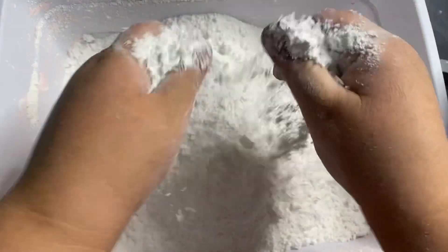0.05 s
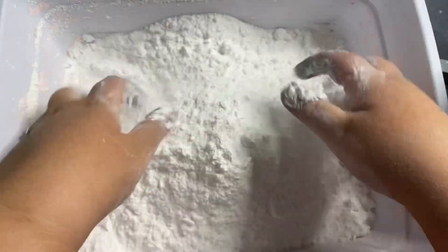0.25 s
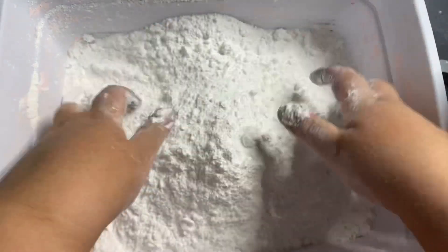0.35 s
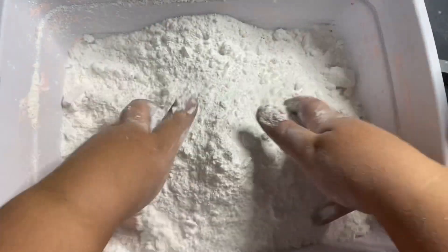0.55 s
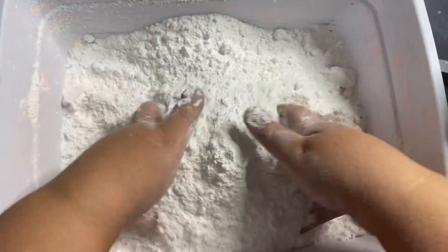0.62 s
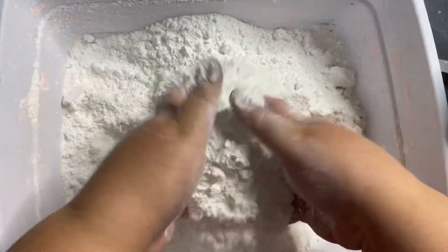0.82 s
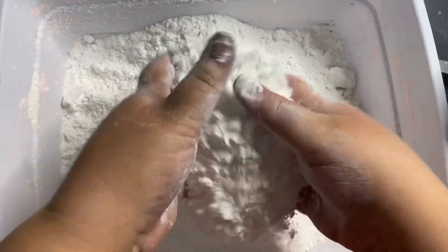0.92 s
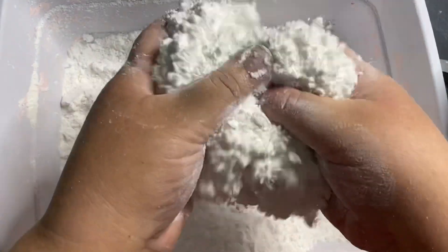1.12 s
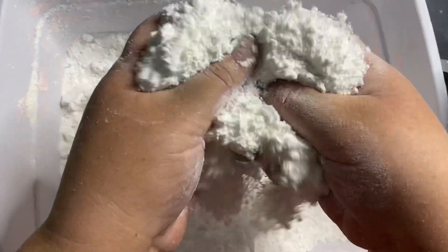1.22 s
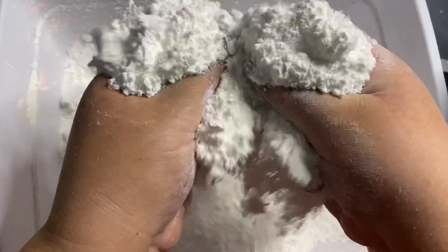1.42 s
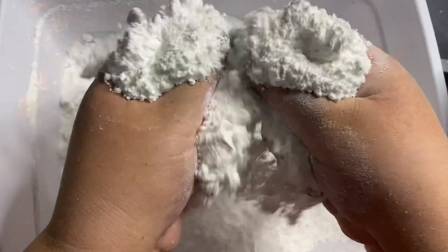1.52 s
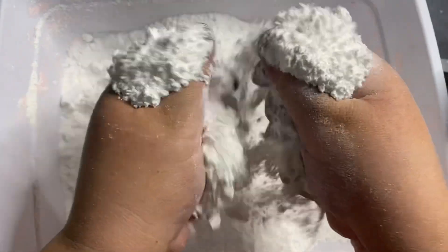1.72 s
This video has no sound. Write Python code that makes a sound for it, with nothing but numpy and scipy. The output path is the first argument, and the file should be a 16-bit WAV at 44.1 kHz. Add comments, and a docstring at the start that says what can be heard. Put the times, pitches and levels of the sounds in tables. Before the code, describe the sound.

Soft chalk powder is worked by hand in a plastic tub, close and dry in a quiet room. At about 0.3 seconds a handful thuds down and the tub booms. From 0.4 to 0.8 seconds hands plough through with a fine hiss and low rub. From about 1 second to 1.75, squeezed powder crunches and small lumps snap, over a faint rumble of stirred air.

```python
"""A handful of soft chalk powder thuds into a plastic tub, close to the microphone in a quiet room.
Two hands plough through the heap with a fine hiss and a low rub, then lift and squeeze the powder:
it crunches in tiny fractures and small lumps snap. Underneath, the handled tub booms
and the air stirred by the hands rumbles. The sound is dry and mono."""
import sys
import numpy as np
from scipy.fft import rfft, irfft, next_fast_len
from scipy.io import wavfile
from scipy.ndimage import map_coordinates

SR = 44100
rng = np.random.default_rng(int(sys.argv[2]) if len(sys.argv) > 2 else 0)


def output_pcm(signal):
    """Save a mono or channel-first signal as 16-bit PCM at the path in sys.argv[1].

    Samples are clipped to [-1, 1] before scaling.
    """
    pcm = np.clip(np.atleast_2d(signal).T, -1, 1) * 32767
    wavfile.write(sys.argv[1], SR, np.round(pcm).astype(np.int16))


N = 77175


def amp(db):
    return 10 ** (np.asarray(db) / 20)


def unit(x):
    return x / np.sqrt(np.mean(x ** 2) + 1e-20)


def along(points, hz):
    """Interpolate (frequency [Hz], value) points on a log frequency axis."""
    freqs, values = np.transpose(points)
    return np.interp(np.log(hz + 1), np.log(freqs + 1), values)


def level(rows):
    """A gain per sample from (time [s], level [dB]) points."""
    times, db = np.transpose(rows)
    return amp(np.interp(np.arange(N) / SR, times, db))


def wobble(rate):
    """A smooth random curve, rate knots a second."""
    return map_coordinates(rng.standard_normal(4096), [np.arange(N) * rate / SR], mode="wrap")


def colour(x, gain):
    """Minimum-phase filter with the given gain as a function of frequency."""
    size = 2 * next_fast_len(len(x))
    cepstrum = irfft(np.log(np.maximum(gain(np.fft.rfftfreq(size, 1 / SR)), 1e-6)), size)
    cepstrum[1:size // 2] *= 2
    cepstrum[size // 2 + 1:] = 0
    return irfft(rfft(x, size) * np.exp(rfft(cepstrum)), size)[:len(x)]


def shaped(x, spectrum):
    """x filtered by (frequency [Hz], gain [dB]) points, at rms 1."""
    return unit(colour(x, lambda hz: amp(along(spectrum, hz))))


def add(out, start_s, x):
    """Mix x into out from start_s on."""
    i = int(round(start_s * SR))
    out[i:i + len(x)] += x[:len(out) - i]


def grains(per_s, spread_db):
    """Random tiny fractures of uneven size."""
    chance, size, sign = rng.random(N), rng.standard_normal(N), rng.choice([-1, 1], N)
    return (chance < per_s / SR) * sign * amp(spread_db * np.minimum(size, 2))


def thuds(scatter_db=-23, scatter_t60=0.086, floor_hz=84, floor_t60=0.12, lag_s=0.000979):
    """Soft blows: a dull push spreads through the plastic, powder scatters, the tub and its floor ring."""
    # blows on the tub (time [s], level [dB], hardness [Hz], relative ring [dB], relative bass [dB])
    blows = [(0.2329, -1, 910, -15.5, -8), (0.3199, 0, 1570, -1, -15), (.3238, -8.5, 795, -1, -33),
             (.342, -20.5, 1410, -19, 5), (.362, -27, 910, -6, -20), (.444, -34, 596, -14, -22),
             (.559, -27, 500, 4, -23), (.580, -21.5, 700, -11, -20), (0.5843, -17, 1490, -2, -35),
             (.716, -29, 805, -3, -25), (.957, -29, 1400, -3, -22), (1.218, -29.5, 1800, 5.5, -27),
             (1.7262, -20.5, 1100, -0.5, -24)]
    # modes of the tub (frequency [Hz], relative level [dB], t60 [s])
    tub_modes = [(220.1, -15.5, 0.1), (290, -59, .1), (335.7, -13.5, 0.12), (458, -20, 0.12),
                 (509, -14, 0.078), (720, -23.5, 0.12), (798, -17.5, 0.089), (1040, -27, .1),
                 (1294, -23, .1), (1400, -31, 0.13), (1500, -51, 0.069), (1810, -25.5, 0.031),
                 (2800, -12, .03)]
    # the dull push of a blow (frequency [Hz], gain [dB])
    push_spectrum = [(30, 1.5), (90, 5.5), (240, 12.5), (420, -3), (650, 6), (820, 3), (930, -3.5),
                     (1300, 4.5), (1900, -5.5), (2300, -22), (2900, -4), (5000, -24), (15000, -4)]
    # the faint crack as it begins (frequency [Hz], gain [dB])
    crack_spectrum = [(1000, -17), (4000, -30), (8000, -39), (15000, -60)]
    out, t = np.zeros(N), np.arange(SR // 3) / SR
    freqs = np.fft.rfftfreq(len(t), 1 / SR)
    # bending waves: 500 Hz arrives lag_s late, lower tones later still
    dispersion = np.exp(-4j * np.pi * lag_s * np.sqrt(500 * freqs))
    for start_s, db, hard_hz, ring_db, bass_db in blows:
        soft = lambda hz: 1 / np.sqrt(1 + (hz / hard_hz) ** 6)
        body = lambda hz: soft(hz) * amp(along(push_spectrum, hz))
        impact = colour(1. * (t == 0), lambda hz: body(hz) + amp(along(crack_spectrum, hz)))
        push = irfft(rfft(impact) * dispersion, len(t))
        scatter = unit(colour(rng.standard_normal(len(t)), body)) * amp(scatter_db - 60 * t / scatter_t60)
        ring = sum(soft(hz) * amp(mode_db + rng.normal() - 60 * t / t60) * np.sin(2 * np.pi * hz * t)
                   for hz, mode_db, t60 in tub_modes)
        bass = amp(bass_db - 60 * t / floor_t60) * np.sin(2 * np.pi * floor_hz * t)
        add(out, start_s, amp(db) * (push / np.abs(push).max() + scatter + amp(ring_db) * ring - bass))
    return out


def snaps(crumble_db=-16, crumble_t60=0.012):
    """A lump breaks with a muffled click and crumbles for a few milliseconds."""
    # breaking lumps (time [s], click peak [dB], pitch [Hz], relative thin crack [dB])
    lumps = [(0.103, -22.5, 7600, -12), (0.1243, -33, 1100, 3), (0.208, -30, 900, -31),
             (.858, -31.5, 2170, -19), (.9282, -27.5, 3480, -12), (0.9983, -26.5, 1940, -13.5),
             (1.014, -41, 2400, -14), (1.0442, -32, 4500, -15), (1.061, -29, 4200, -1),
             (1.1276, -28, 5000, -12), (1.165, -22.5, 5150, 1), (1.1734, -26, 4540, -2),
             (1.184, -22, 1340, -15), (1.195, -26, 1260, -13), (1.2181, -16.5, 1730, -32),
             (1.231, -29, 1730, -6), (1.2548, -21, 1900, -15), (1.333, -25.5, 2200, -13),
             (1.3571, -24.5, 4930, 2), (1.383, -19.5, 2300, -3), (1.4056, -25.5, 2170, -14),
             (1.441, -12.5, 2940, -3), (1.477, -20, 2120, -28), (1.4912, -18, 2740, -15),
             (1.521, -24, 2800, 3), (1.551, -17.5, 1780, -24), (1.596, -23.5, 3200, 11),
             (1.628, -28.5, 2800, -17)]
    out, t = np.zeros(N), np.arange(SR // 20) / SR
    for start_s, db, pitch_hz, crack_db in lumps:
        highpass = lambda hz: hz / np.hypot(hz, 0.24 * pitch_hz)
        lowpass = lambda hz: 1 / np.sqrt(1 + (hz / (1.49 * pitch_hz)) ** 8)
        band = lambda hz: highpass(hz) * (lowpass(hz) + amp(crack_db) * pitch_hz / np.hypot(hz, pitch_hz))
        click = colour(1. * (t == 0), band)
        crumble = unit(colour(rng.standard_normal(len(t)), band)) * amp(crumble_db - 60 * t / crumble_t60)
        add(out, start_s, amp(db) * (click / np.abs(click).max() + crumble))
    return out


def crunch(peak_grains_per_s=3000, clump_db=2):
    """Squeezed powder fractures: single ticks under a light grip, dense clumps under a hard one."""
    # squeezing of the lifted handfuls (time [s], level [dB])
    grip = [(0, -52.5), (.1, -60), (.22, -49.5), (.36, -74), (.45, -50), (.7, -59), (.85, -61.5),
            (.95, -60), (1.07, -47.5), (1.15, -53), (1.185, -42), (1.3, -49), (1.45, -43.5), (1.6, -43.5),
            (1.75, -45.5)]
    # fracturing powder (frequency [Hz], gain [dB])
    spectrum = [(200, -28.5), (600, -3.5), (1100, -3), (2000, 2), (3600, -1), (4400, -3), (6500, -3.5),
                (9000, -5), (11500, -12.5), (15500, -14)]
    squeeze = level(grip)
    density = (squeeze / squeeze.max()) ** 0.9
    fractures = grains(peak_grains_per_s * density, spread_db=6) / np.sqrt(density)
    return shaped(fractures * amp(clump_db * wobble(170)), spectrum) * squeeze


def rub(flutter_db=2):
    """The heap rubs on the tub as the hands plough through it."""
    # push of the hands into the heap (time [s], level [dB])
    plough = [(0, -51.5), (.1, -52), (.2, -48.5), (.25, -36), (.33, -31.5), (.38, -42), (.45, -33.5),
              (.5, -39), (.55, -41.5), (.62, -43), (.70, -37.5), (.76, -46.5), (.83, -54), (1.0, -47),
              (1.14, -49.5), (1.22, -43), (1.3, -45.5), (1.44, -45), (1.75, -45.5)]
    # powder rubbing on plastic (frequency [Hz], gain [dB])
    spectrum = [(50, -19), (165, -3.5), (205, -0.5), (340, 4), (410, -1.5), (560, 2), (850, -9),
                (1200, -9.5), (1800, -15), (3000, -21), (12000, -40)]
    return shaped(rng.standard_normal(N) * amp(flutter_db * wobble(70.2)), spectrum) * level(plough)


def hiss(flutter_db=1.0):
    """Fine dust slides over the fingers, its ticks so dense that they merge."""
    # flow of the powder (time [s], level [dB])
    flow = [(0, -53), (.05, -54), (.075, -57.5), (.2, -62), (.27, -61), (.305, -45), (.325, -62),
            (.345, -66), (.41, -64), (.47, -53), (.54, -47), (.64, -41.5), (.715, -40.5), (.75, -48.5),
            (.79, -51.5), (.82, -64.5), (.95, -59.5), (1.15, -53.5), (1.45, -52.5), (1.75, -49)]
    # sliding dust (frequency [Hz], gain [dB])
    spectrum = [(300, -39), (1500, -7.5), (2500, -10.5), (5000, -4), (6400, -7.5), (8700, 1), (10000, -2),
                (11000, -7.5), (13500, -10), (15500, -14)]
    dust = grains(per_s=16000, spread_db=3.5)
    return shaped(dust * amp(flutter_db * wobble(150)), spectrum) * level(flow)


def digs():
    """Fingertips dig in: a smooth scrape, darker than the hiss, swells and fades."""
    # fingertip strokes (peak time [s], level [dB], rise [s], fall [s])
    strokes = [(.304, -42.5, 0.008, 0.013), (0.541, -39.5, 0.077, 0.078)]
    # scraped powder (frequency [Hz], gain [dB])
    spectrum = [(300, -24), (800, 9), (1150, -8), (1700, 2), (2300, -5.5), (3000, -1), (3800, -0.5),
                (4400, -11), (7000, -6), (10000, -14.5), (15000, -36)]
    t = np.arange(N) / SR
    force = sum(amp(db - 6.7 * ((t - peak_s) / np.where(t < peak_s, rise, fall)) ** 2)
                for peak_s, db, rise, fall in strokes)
    return force * shaped(rng.standard_normal(N), spectrum)


def boom(pitch_hz=121.1, wander_hz=4.35, flutter_db=1.85):
    """A narrow low resonance swells and wavers as the tub is handled."""
    # the tub's low boom (time [s], level [dB])
    swell = [(0, -44.5), (.2, -53), (.24, -34), (.275, -17), (.31, -17), (.345, -33), (.40, -26),
             (.45, -45), (.5, -36.5), (.55, -39), (.64, -27.5), (.71, -40.5), (.75, -35), (.82, -54),
             (.855, -35.5), (.9, -43), (.96, -37), (1.1, -48), (1.19, -50.5), (1.24, -38), (1.31, -49.5),
             (1.45, -35.5), (1.5, -50), (1.66, -41.5), (1.75, -43)]
    hz = pitch_hz + wander_hz * wobble(21.9)
    tone = np.sin(2 * np.pi * np.cumsum(hz) / SR)
    return unit(tone * amp(flutter_db * wobble(50))) * level(swell)


def stirred_air():
    """The hands move the air close to the microphone, and it rumbles."""
    # movement of the air (time [s], level [dB])
    stir = [(0, -39), (.19, -76), (.24, -46), (.45, -32.5), (.6, -37), (.73, -40.5), (.85, -47), (1.2, -49),
            (1.4, -43.5), (1.75, -42)]
    # its rumble (frequency [Hz], gain [dB])
    spectrum = [(8, -5.5), (28, 22), (45, 11.5), (70, 10.5), (110, 20), (300, -50)]
    return shaped(rng.standard_normal(N), spectrum) * level(stir)


def room_tone(db=-47.5):
    """Steady low noise of the room behind the tub."""
    # the quiet room (frequency [Hz], gain [dB])
    spectrum = [(20, -8.5), (70, 8), (150, -5), (300, -1), (600, -20), (1200, -22), (4000, -24.5),
                (9000, -62), (15500, -39)]
    return shaped(rng.standard_normal(N), spectrum) * amp(db)


def scene():
    """Tub and hands, close and dry at one microphone."""
    chalk = thuds() + snaps() + digs() + hiss() + rub() + crunch()
    return (chalk + boom() + stirred_air() + room_tone())[None]


def record(dry, top_hz=15850):
    """The recorder keeps nothing above its band limit."""
    size = next_fast_len(N + SR // 4)
    passband = np.fft.rfftfreq(size, 1 / SR) < top_hz
    return irfft(rfft(dry, size) * passband, size)[..., :N]


dry = scene()
out = record(dry)
output_pcm(out)
```